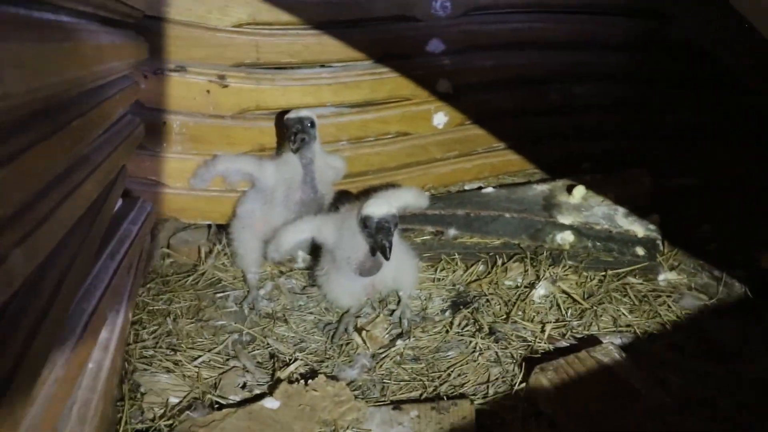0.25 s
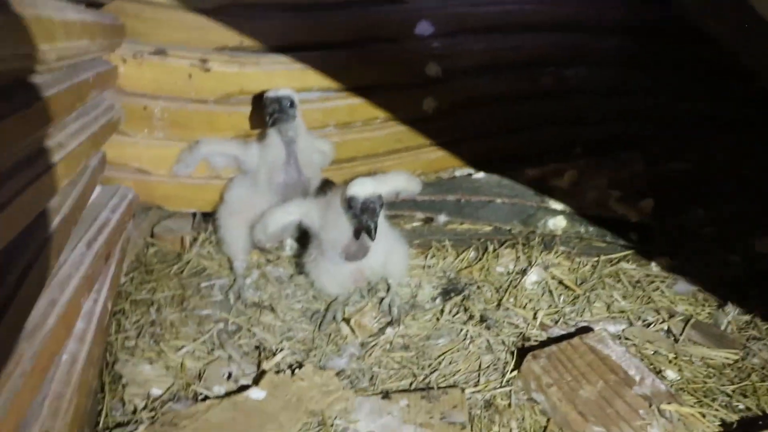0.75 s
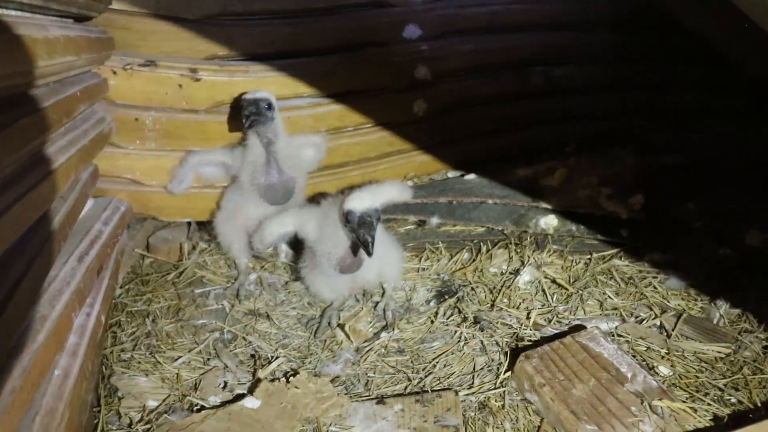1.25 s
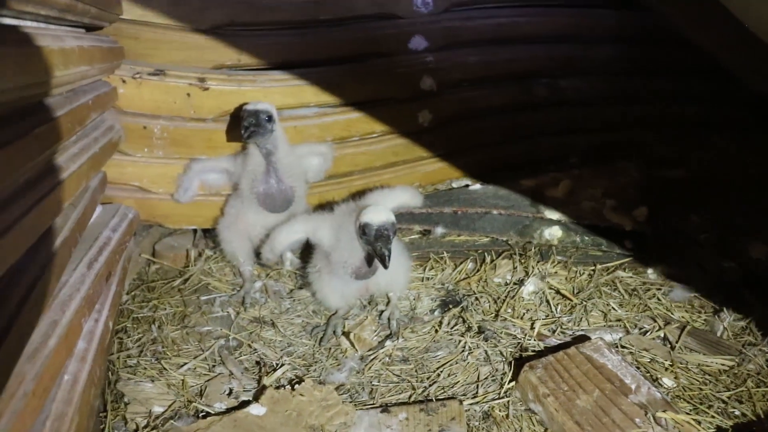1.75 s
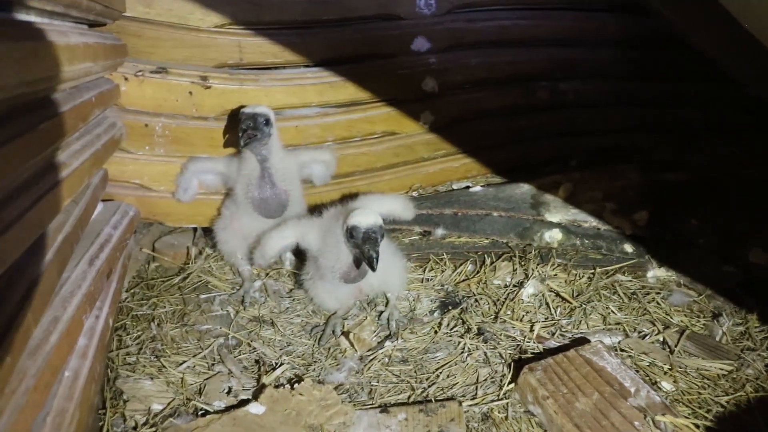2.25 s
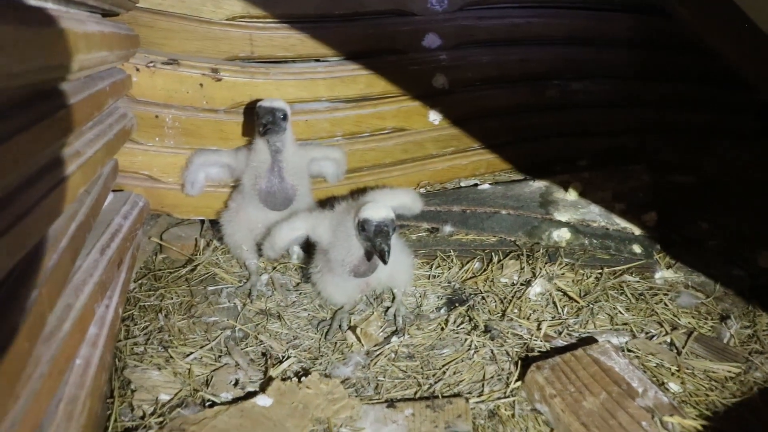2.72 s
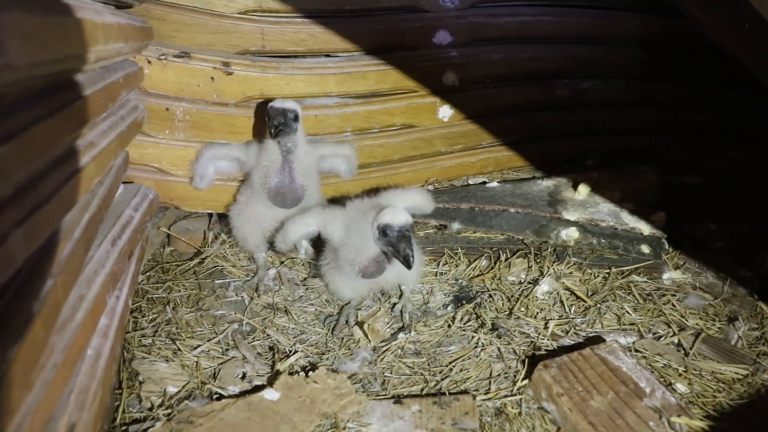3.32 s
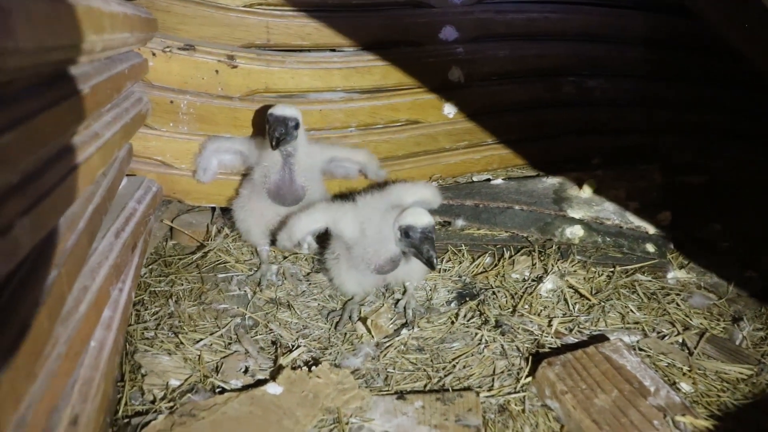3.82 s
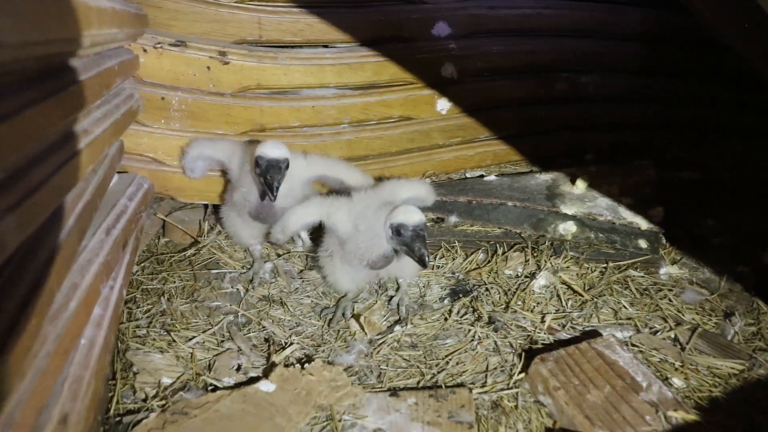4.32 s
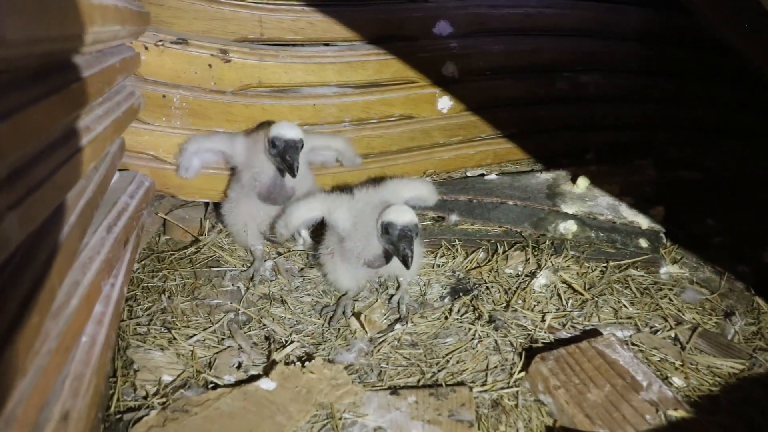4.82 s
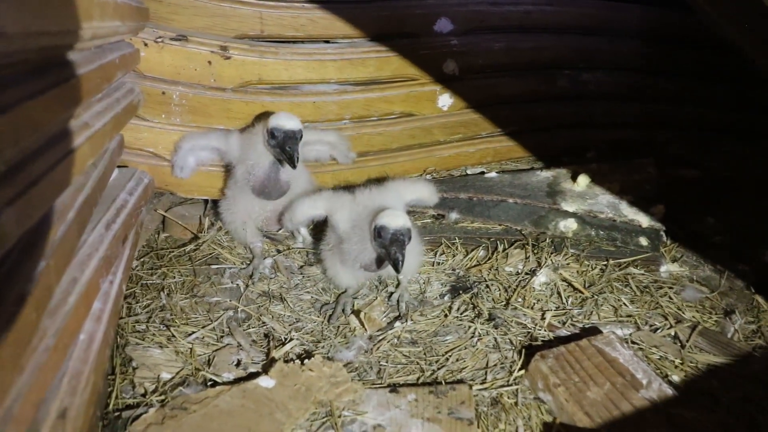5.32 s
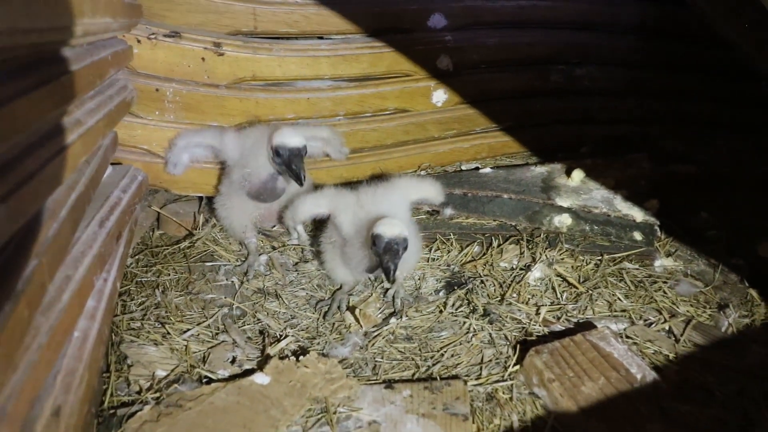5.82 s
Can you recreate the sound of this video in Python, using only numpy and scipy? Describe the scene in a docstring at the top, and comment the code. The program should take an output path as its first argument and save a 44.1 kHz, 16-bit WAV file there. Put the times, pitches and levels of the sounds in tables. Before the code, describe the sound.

Two vulture chicks hiss close by in the corner of a quiet wooden barn. Each hiss is rushing, sputtering air, a dark roar from the throat with a bright jet at the beak. A soft hiss opens, overtaken at 0.6 seconds by a loud one that swells and ebbs until about 1.9. A second soft hiss follows, then a loud one from 2.6 to 4 seconds. The third soft hiss grows from almost nothing at 4 seconds, and the last loud one runs from 4.7 to 6. Feet thud softly on the floor a few times around 0.7 seconds and again near 2.8. At 5.5 seconds there is one sharp, short knock on wood. The boards ring briefly and colour the hisses a little differently on the left and right, and a faint low rumble lies underneath throughout.

```python
"""Two vulture chicks hiss close by in the corner of a quiet wooden barn, soft and loud hisses in turn.
Each hiss is rushing, sputtering air: a dark roar from the throat and a bright jet at the beak.
Echoes off the boards colour it differently on the left and right. Under it lies a faint rumble.
Feet thud softly on the floor, and near the end there is one sharp knock on wood."""
import sys
import numpy as np
from scipy import signal
from scipy.fft import rfft, irfft, next_fast_len
from scipy.io import wavfile
from scipy.ndimage import map_coordinates

SR = 44100
rng = np.random.default_rng(int(sys.argv[2]) if len(sys.argv) > 2 else 0)


def dump_mix(stems):
    """Bounce the given channels to the path in sys.argv[1] as a 16-bit WAV at rate SR."""
    frames = np.atleast_2d(stems).T  # one column per channel
    limited = np.clip(frames, -1, 1)  # hard clip at full scale
    pcm = np.round(limited * 32767).astype(np.int16)
    wavfile.write(sys.argv[1], SR, pcm)


N = 266893

# Resonances: the pitches that throat and beak boost, one table for the head's pose in each hiss.
# (frequency [Hz], width [Hz], relative left level [dB], relative right level [dB])
SOFT_1_PEAKS = [(422, 870, -4, -3.5), (731, 230, -1.5, 0), (1059, 320, 0.5, 0.5), (1635, 140, -11, -17),
                (2360, 460, -28.4, -8.5), (2920, 1050, -8.5, -3), (3473, 620, -3.5, -1.5),
                (4300, 2200, -6, -5), (5720, 660, -3.5, -5), (6560, 960, -0.2, -1), (7786, 1714, -16, -9),
                (8330, 250, 1, -15), (9142, 640, -10, -7), (9600, 500, -6.5, -19), (10976, 421, -28.4, -7),
                (12200, 2900, -7, -10.5)]
SOFT_2_PEAKS = [(450, 116, -5.5, -5), (694, 270, -5, -5), (1003, 340, -5.5, -5), (2260, 470, -23, -10),
                (2920, 230, 0.5, -6), (3270, 340, -28.2, 0.0), (3600, 480, -3.4, -6), (4650, 2600, -6, -5),
                (5099, 389, -22.5, -17.9), (6760, 1230, -3.2, -3), (7830, 6000, -10.5, -28.2),
                (8470, 640, -12.3, 1.5), (9600, 440, -8, -20), (10700, 5100, -17, -14),
                (12600, 506, -8, -18), (13465, 1300, -15, -19)]
SOFT_3_PEAKS = [(452, 160, -4.5, -3.5), (660, 330, -5, -4), (970, 370, -3.5, -3.5), (2390, 500, -15.4, -8),
                (3052, 296, -17, -20.7), (3251, 388, -22.5, -6), (3240, 746, -7, -1),
                (4315, 480, -20.5, -8.5), (4930, 3100, -8, -26), (6060, 1700, -24.6, -6.5),
                (7010, 270, -7, -4), (8180, 1600, -10, -10.5), (9600, 440, -23, -13),
                (10867, 1015, -12, -12), (11700, 417, -10, -24.6), (12568, 4400, -19.5, -16.5)]
LOUD_1_PEAKS = [(435, 280, -10.5, -11), (870, 1100, -13.5, -10), (1290, 480, -6.5, -7.5),
                (1802, 287, -9.5, -5), (2180, 230, -17, -8), (2650, 820, -11, -21), (3110, 540, -34.7, -8),
                (3656, 160, 4, -4), (4840, 1500, -8.5, -10.5), (4920, 390, -34.7, -2.5),
                (6300, 927, -3.5, -27), (6600, 480, -34.7, -7), (7740, 1150, -6.5, -17),
                (8500, 530, -17, -9), (9200, 200, -20, -16), (9655, 1100, -10.5, -17),
                (10600, 620, -18.9, -12.5), (10700, 520, -10.5, -27), (11700, 1200, -8, -16),
                (12400, 470, -34.7, -20), (13000, 3900, -14.5, -20.5)]
LOUD_2_PEAKS = [(470, 170, -9.5, -9.5), (680, 520, -13.5, -10), (1290, 600, -5.5, -5.5),
                (1820, 320, -9.5, -4), (2190, 210, -12, -9), (2590, 680, -9.5, -21),
                (2940, 840, -34.4, -7.5), (3770, 530, 0, -26), (4840, 229, -12, -36),
                (4700, 1400, -34.3, -2.5), (5660, 260, -16, -3), (5800, 3000, -4.5, -10.5),
                (7200, 340, -11, -6), (8000, 656, -5, -22), (8500, 300, -8, -8), (9000, 350, -3, -5),
                (10240, 2000, -7, -7.6), (11800, 301, -6, -15), (12070, 890, -5.5, -34.4),
                (12770, 540, -13, -6.5), (14200, 2100, -14.5, -20.5)]
LOUD_3_PEAKS = [(497, 170, -16.5, -16.5), (660, 530, -17, -15), (1300, 500, -12.5, -11.5),
                (1770, 235, -22, -16.5), (2280, 1150, -27, -16.5), (3030, 290, -41.3, -6),
                (3070, 1140, -10.5, -24.8), (3630, 550, -8.5, -15), (4050, 120, 1, -1),
                (4180, 225, -11, -19), (4320, 130, -9, -10), (5000, 960, -10, -9.5),
                (5900, 319, -14.5, -15), (6550, 770, -10.5, -40), (7130, 340, -12, -14.5),
                (7940, 690, -14, -19), (8150, 840, -19, -10), (9560, 1350, -14.5, -21.5),
                (10480, 690, -27, -14.5), (11900, 2300, -19, -22), (14200, 1700, -23, -25)]
# Dips, where echoes off the boards and floor cancel the sound in each pose.
# (frequency [Hz], width [Hz], level change [dB])
SOFT_1_DIPS = [(2660, 270, -14), (4910, 446, -10), (11100, 173, -11)]
SOFT_2_DIPS = [(2840, 340, -11), (5050, 380, -19), (8600, 470, -15)]
SOFT_3_DIPS = [(3120, 270, -12), (10606, 241, -9)]
LOUD_1_DIPS = [(1440, 243, -15), (3686, 260, -20.5), (5300, 122, -10)]
LOUD_2_DIPS = [(1440, 220, -16.5), (3885, 330, -10.5), (9270, 122, -11)]
LOUD_3_DIPS = [(1445, 265, -19), (2914, 290, -15.5), (4040, 420, -19), (8500, 120, 0)]
# The head's pose in each hiss. (peaks [table], dips [table])
SOFT_POSES = [(SOFT_1_PEAKS, SOFT_1_DIPS), (SOFT_2_PEAKS, SOFT_2_DIPS), (SOFT_3_PEAKS, SOFT_3_DIPS)]
LOUD_POSES = [(LOUD_1_PEAKS, LOUD_1_DIPS), (LOUD_2_PEAKS, LOUD_2_DIPS), (LOUD_3_PEAKS, LOUD_3_DIPS)]
# Gentle pushes of air. (start [s], end [s], throat level [dB], beak level [dB], throat climb [dB],
# beak climb [dB], left side's lead [s], resonance slide [fraction], floor echo delay [s], its drift [s])
SOFT_HISSES = [(0.0, 0.901, -35, -29, 1.6, 2, 2e-6, -0.02, 0.00031, 0.000072),
               (1.868, 2.88, -35.5, -29.5, 4, 7.5, 2e-6, -0.025, .000297, 1.5e-5),
               (4.009, 4.899, -36.5, -34.5, 20, 22.5, -1.8e-5, 0.013, 0.000239, 0.000016)]
# Hard pushes of air. (start [s], end [s], throat level [dB], beak level [dB], beak swell [dB],
# gullet against throat [dB], resonance slide [fraction], floor echo delay [s], its drift [s])
LOUD_HISSES = [(0.58, 1.946, -31, -25, 5.5, -11, 0.011, .000455, 5e-5),
               (2.56, 3.994, -30.5, -22.5, 4, -9.5, 0.011, .000503, -4e-5),
               (4.68, 5.97, -31, -24, 2.6, -10, 0.006, 0.000409, -3.8e-5)]
# Echoes off the nearest boards. (typical delay [s])
BOARD_DELAYS = [.0017, .0022, .0028]
# How long the wooden walls ring. (frequency [Hz], time to fade by 60 dB [s])
WALL_RING = [(200, 0.076), (2000, 0.3), (12000, 0.15)]
# The tone of the barn's rumble. (frequency [Hz], relative level [dB])
RUMBLE_SHAPE = [(20, -19), (45, -7), (72, 0.5), (90, 0), (125, -1), (170, -3.5), (260, -3.5), (500, -12),
                (1100, -12), (1700, -18), (6000, -23), (15000, -31)]
# Feet on the floor. (time [s], level [dB], pitch [Hz], time to fade by 60 dB [s])
FOOTSTEPS = [(0.608, -37.5, 149, 0.092), (0.709, -35.5, 255, 0.11), (0.752, -31, 109, 0.073),
             (0.781, -32, 100, 0.082), (2.621, -48, 262, 0.038), (2.784, -30.5, 261, 0.068)]
# The knock and its rebound. (time [s], level [dB])
KNOCK_HITS = [(5.4939, -6.5), (5.4975, -22)]
# The tones of the knocked wood. (frequency [Hz], relative level [dB], time to fade by 60 dB [s])
WOOD_TONES = [(340, -4.5, 0.021), (710, -8, 0.034), (920, -7, 0.025), (1270, -9, .008),
              (2610, -11.5, 0.012)]


def amp(db):
    """Turn decibels into a gain to multiply by."""
    return 10 ** (np.asarray(db) / 20)


def unit(x):
    """Scale x to an average (rms) level of 1."""
    return x / np.sqrt(np.mean(x ** 2) + 1e-20)


def along(points, hz):
    """Read between (frequency, value) points on a log frequency scale."""
    freqs, values = np.transpose(points)
    return np.interp(np.log(hz + 1), np.log(freqs + 1), values)


def ramp(t, length):
    """Rise from 0 to 1 over length seconds."""
    return np.clip(t / length, 0, 1)


def wobble(rate, size):
    """A smooth curve through rate random values a second."""
    return map_coordinates(rng.standard_normal(int(size * rate / SR) + 4), [np.arange(size) * rate / SR])


def filtered(x, response):
    """Multiply each frequency in x by response(hz)."""
    size = x.shape[-1]
    padded = next_fast_len(size + SR // 8)
    return irfft(rfft(x, padded) * response(np.fft.rfftfreq(padded, 1 / SR)), padded)[..., :size]


def add(track, start, sound):
    """Mix a sound into a track, start seconds in."""
    part = track[..., max(round(start * SR), 0):][..., :sound.shape[-1]]
    part += sound[..., :part.shape[-1]]


def soft_hisses():
    """Gentle, wet hisses: each climbs, holds, then fades under the next loud one, the throat first."""
    attack_s, throat_climb_s, beak_climb_s, throat_fade_s, beak_fade_s = 0.0059, 0.37, 0.48, 0.27, 0.18
    out = np.zeros((2, N))
    for row, pose in zip(SOFT_HISSES, SOFT_POSES):
        start, end, throat_db, beak_db, throat_climb_db, beak_climb_db, left_lead_s, slide, *echo = row
        t = np.arange(round((end - start) * SR)) / SR
        onset, remaining = np.sqrt(ramp(t, attack_s)), t[-1] - t
        throat = np.interp(t, [0, throat_climb_s], amp([throat_db - throat_climb_db, throat_db]))
        throat *= onset * ramp(remaining, throat_fade_s)
        beak = np.interp(t, [0, beak_climb_s], amp([beak_db - beak_climb_db, beak_db]))
        beak *= onset * np.sqrt(ramp(remaining, beak_fade_s))
        add(out, start, hiss(throat, beak, pose, echo, slide, sputter_db=3.5, spread=0.42,
                             gullet_db=-16, left_lead_s=left_lead_s))
    return out


def hiss(throat_gain, beak_gain, pose, echo, slide, sputter_db, spread, gullet_db, left_lead_s):
    """One long push of air: a dark throat roar and a bright, sputtering jet at the beak."""
    size = len(throat_gain)
    # swirls of air break off unevenly: quick spurts on a slower flutter
    flutter = amp(0.3 * unit(wobble(7.75, size) + 0.66 * wobble(99.3, size)))
    spurts = amp(sputter_db * unit(wobble(1100, size) + 1.26 * wobble(5000, size)))
    air = rng.standard_normal(size)
    side_air = spread * rng.standard_normal((2, size))
    stream = (air + side_air) * flutter
    # the spurts are strongest in the smallest swirls, which sound highest
    highs = lambda hz: 1 / (1 + (4200 / (hz + 1)) ** 3)
    stream = filtered(unit(stream * spurts), highs) + filtered(unit(stream), lambda hz: 1 - highs(hz))
    # a weaker push makes fewer small swirls
    sizzle = filtered(stream, lambda hz: 1 / (1 + (9000 / (hz + 1)) ** 8))
    stream += sizzle * ((beak_gain / np.median(beak_gain)) ** 0.15 - 1)
    # blend three stages so the high resonances slide from start (-1) to end (1)
    progress = np.linspace(-1, 1, size)
    beak = sum(np.maximum(1 - abs(progress - stage), 0) * peaks_and_dips(stream, *pose, slide * stage)
               for stage in (-1, 0, 1))
    throat = peaks_and_dips((air + 0.22 * side_air) * flutter, *pose, shift=0)
    # the throat takes the low pitches, the beak the high ones
    lows = lambda hz: 1 / (1 + (hz / 1480) ** 16)
    throat = filtered(throat, lows)
    beak = board_echoes(filtered(beak, lambda hz: 1 - lows(hz)))
    roar = throat_gain * (unit(throat) + amp(gullet_db) * gullet(size))
    jet = beak_gain * unit(floor_echo(beak, *echo))
    side_delays = np.array([[0], [left_lead_s]])  # left, right
    return filtered(roar + jet, lambda hz: np.exp(-2j * np.pi * hz * side_delays))


def peaks_and_dips(x, peaks, dips, shift, lowest_hz=345, size=4096):
    """Throat and beak boost some pitches; echoes off nearby boards and floor hollow out others."""
    hz = np.fft.rfftfreq(size, 1 / SR)
    hz = hz * (1 - shift * np.interp(hz, [5500, 8000], [0, 1]))  # move the high ones by this fraction
    bell = lambda centre, width: 1 / (1 + (2 * (hz - centre) / width) ** 2)
    power = sum(amp([[left], [right]]) ** 2 * bell(centre, width) ** 2
                for centre, width, left, right in peaks)
    cuts = amp(sum(db * bell(centre, width) for centre, width, db in dips))
    # little passes below the lowest resonance
    gain = cuts * np.sqrt(power / (1 + (lowest_hz / (hz + 1)) ** 12))
    # make the resonances ring after each spurt, not before it (minimum phase)
    cepstrum = irfft(np.log(gain + 1e-4))
    phase = 2 * rfft(cepstrum[:, :size // 2], size).imag
    ring = irfft(gain * np.exp(1j * phase))
    return signal.oaconvolve(x, ring, axes=1)[:, :x.shape[-1]]


def board_echoes(x, echo_db=-15, sway_s=3e-5, turn_s=4e-6):
    """Direct sound and weak echoes off the nearest boards; every path drifts as the head sways."""
    size = x.shape[-1]
    n = np.arange(size)
    out = np.zeros_like(x)
    for side in range(2):
        smooth = signal.resample_poly(x[side], up=4, down=1)  # allows delays finer than a sample
        delayed = lambda delay: np.interp(n - SR * delay, np.arange(len(smooth)) / 4, smooth, left=0)
        out[side] = delayed(turn_s * wobble(0.7, size))
        for delay in BOARD_DELAYS:
            out[side] += amp(echo_db) * delayed(delay * rng.uniform(.9, 1.1) + sway_s * wobble(1.17, size))
    return out


def gullet(size, shut_hz=235, rise_hz=275, open_s=0.22, shut_s=0.13):
    """The lowest resonance rises as the beak opens, sinks as it shuts, and is strongest nearly shut."""
    t = np.arange(size) / SR
    opening = (1 - np.exp(-t / open_s)) * (1 - np.exp(-(t[-1] - t) / shut_s))
    phase = 2 * np.pi * np.cumsum(shut_hz + rise_hz * opening) / SR
    rough_tone = wobble(100, size) * np.cos(phase) + wobble(100, size) * np.sin(phase)
    return (1 - 0.53 * opening) * unit(rough_tone)


def floor_echo(x, delay, drift, echo_db=-14.5, above_hz=5700):
    """The treble also bounces off the floor; its delay drifts as the head moves late in the hiss."""
    n = np.arange(x.shape[-1])
    lag = SR * (delay + drift * (n / len(n)) ** 3)
    treble = filtered(x, lambda hz: 1 - 1 / (1 + (hz / above_hz) ** 10))
    return x + amp(echo_db) * np.array([map_coordinates(side, [n - lag]) for side in treble])


def walls(x):
    """The wooden corner rings briefly after each sound, longest at middle pitches."""
    hz, t, spectrum = signal.stft(rng.standard_normal((2, SR // 4)), SR, nperseg=256)
    fade = amp(-60 * t / along(WALL_RING, hz)[:, None])
    tail = signal.istft(spectrum * fade, SR, nperseg=256)[1]
    tail /= np.linalg.norm(tail[0])
    tail = np.pad(tail, ((0, 0), (SR // 300, 0)))  # arrives just after the direct sound
    return signal.fftconvolve(x, tail, axes=1)[:, :N]


def barn_rumble(settled_db=-52, extra_db=3.5, settle_s=0.8):
    """A faint, unsteady rumble, much alike on both sides, that starts a little louder and settles."""
    noise = rng.standard_normal(N) + 0.65 * rng.standard_normal((2, N))
    level_db = settled_db + extra_db * np.exp(-np.arange(N) / SR / settle_s) + wobble(11, N)
    return amp(level_db) * unit(filtered(noise, lambda hz: amp(along(RUMBLE_SHAPE, hz))))


def loud_hisses():
    """Hard pushes: the throat roars first, then the jet swells and ebbs as the beak opens and shuts."""
    attack_s, release_s, beak_open_s, beak_shut_s = 0.16, 0.05, 0.33, 0.11
    sag_db_per_s, wide_open_drop_db = 2, 0.7
    out = np.zeros((2, N))
    for row, pose in zip(LOUD_HISSES, LOUD_POSES):
        start, end, throat_db, beak_db, swell_db, gullet_db, slide, *echo = row
        t = np.arange(round((end - start) * SR)) / SR
        remaining = t[-1] - t
        opening = np.sin(np.pi * t / t[-1])
        # the roar weakens as the air runs out, and while the beak is wide open
        throat = amp(throat_db - sag_db_per_s * t - wide_open_drop_db * opening ** 2)
        throat *= np.sqrt(ramp(t, attack_s)) * ramp(remaining, release_s)
        beak = amp(beak_db - swell_db * (1 - opening))
        beak *= np.sqrt(ramp(t, beak_open_s)) * ramp(remaining, beak_shut_s)
        add(out, start, hiss(throat, beak, pose, echo, slide, sputter_db=3.0, spread=0.36,
                             gullet_db=gullet_db, left_lead_s=1.7e-5))
    return out


def footsteps(attack_s=0.0037):
    """Soft feet on the floor give dull thuds, each one low tone that dies quickly."""
    out, t = np.zeros(N), np.arange(SR // 4) / SR
    onset = 1 - np.exp(-t / attack_s)
    for start, db, hz, fade_s in FOOTSTEPS:
        add(out, start, amp(db - 60 * t / fade_s) * onset * np.sin(2 * np.pi * hz * t))
    return out


def knock():
    """A hard knock and its rebound make the wood ring for a moment."""
    out, t = np.zeros(N), np.arange(SR // 4) / SR
    ring = sum((-1) ** k * amp(db - 60 * t / fade_s) * np.sin(2 * np.pi * hz * t)
               for k, (hz, db, fade_s) in enumerate(WOOD_TONES))
    # a small board gives off little bass
    ring = signal.sosfilt(signal.butter(2, 150, "high", fs=SR, output="sos"), ring)
    for start, db in KNOCK_HITS:
        add(out, start, amp(db) * ring)
    return out


def scene():
    """Hisses, feet and knock, with the ring of the walls and the barn's rumble."""
    slightly_right = amp([[-1.5], [1.5]])
    near = soft_hisses() + loud_hisses() + slightly_right * (footsteps() + knock())
    return near + amp(-18) * walls(near) + barn_rumble()


def record(dry):
    """Cut away the very highest treble."""
    top_hz = 15900
    return filtered(dry, lambda hz: hz < top_hz)


dry = scene()
out = record(dry)
dump_mix(out)
```